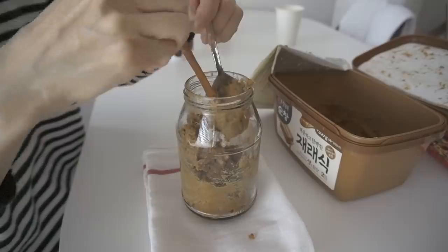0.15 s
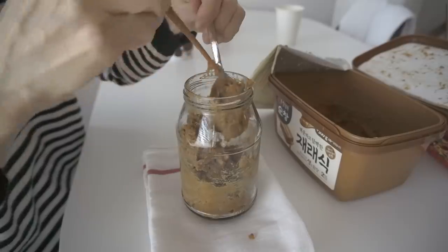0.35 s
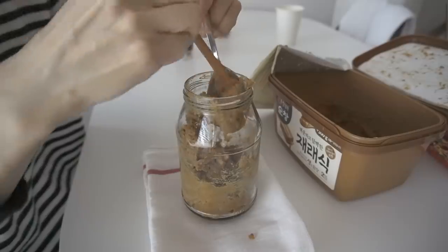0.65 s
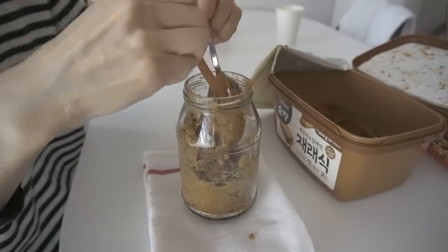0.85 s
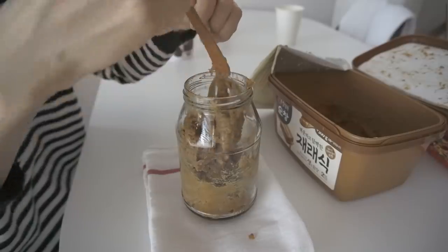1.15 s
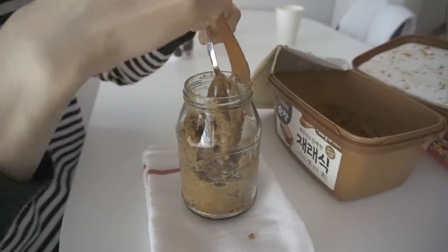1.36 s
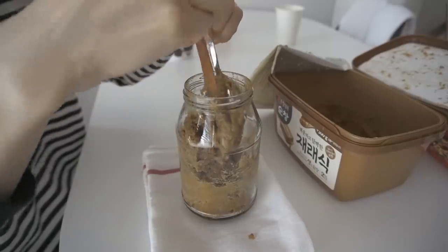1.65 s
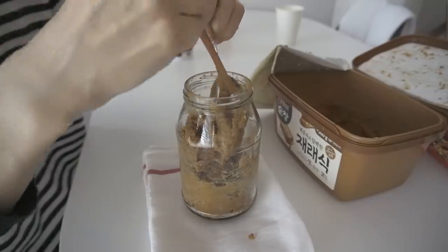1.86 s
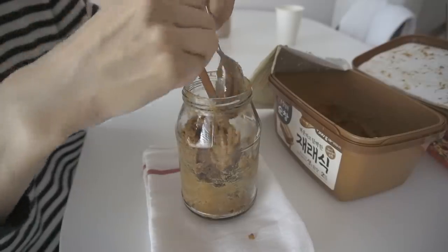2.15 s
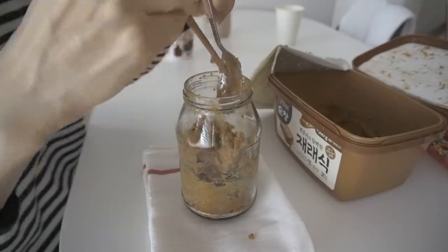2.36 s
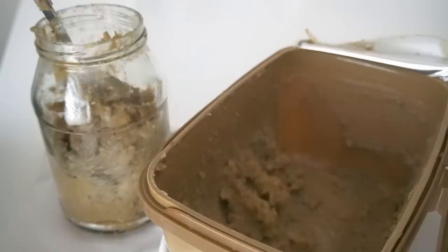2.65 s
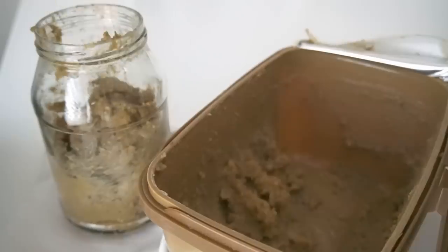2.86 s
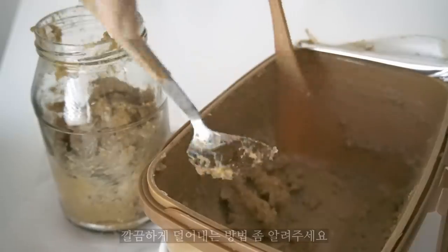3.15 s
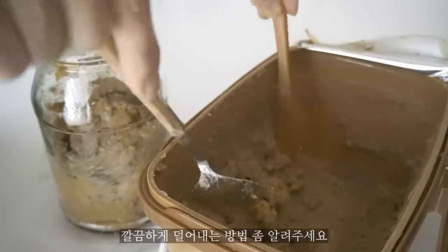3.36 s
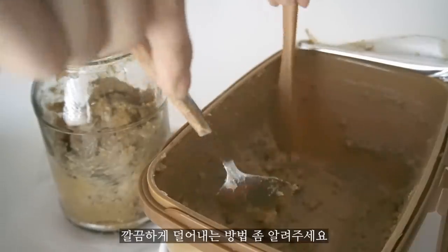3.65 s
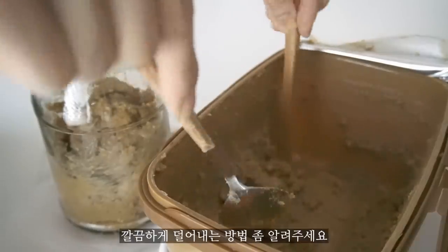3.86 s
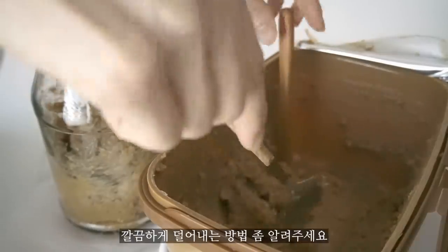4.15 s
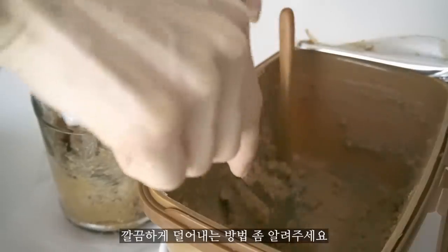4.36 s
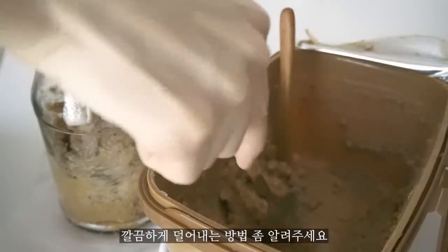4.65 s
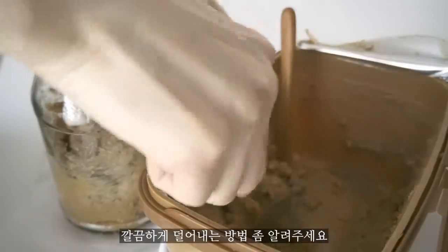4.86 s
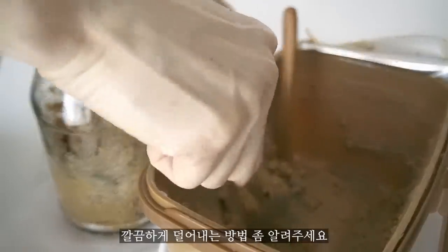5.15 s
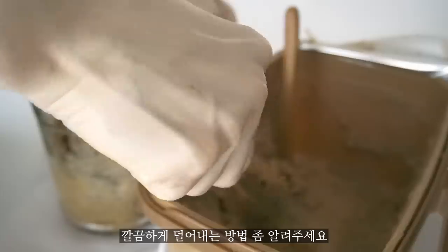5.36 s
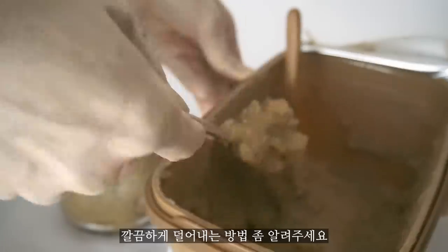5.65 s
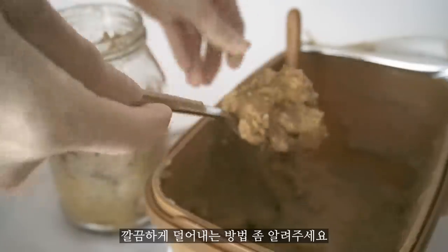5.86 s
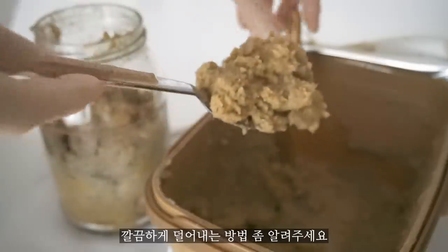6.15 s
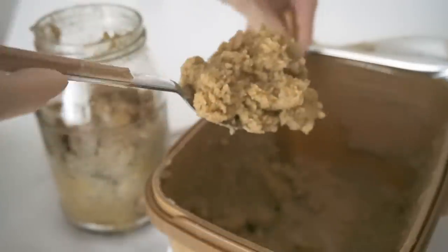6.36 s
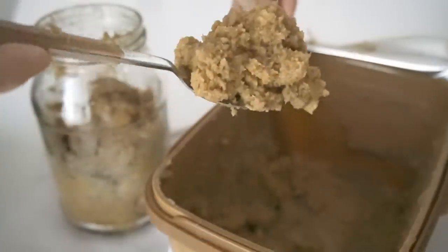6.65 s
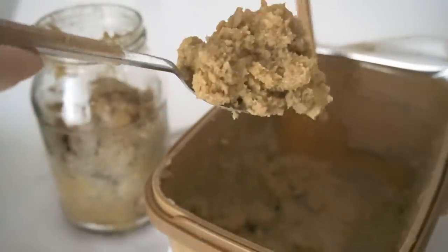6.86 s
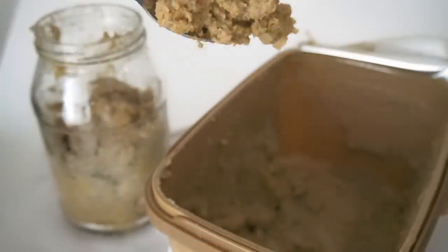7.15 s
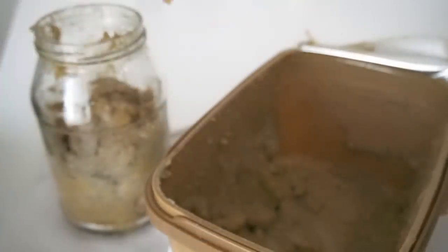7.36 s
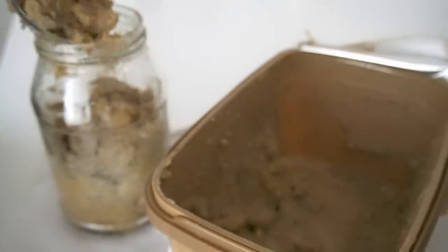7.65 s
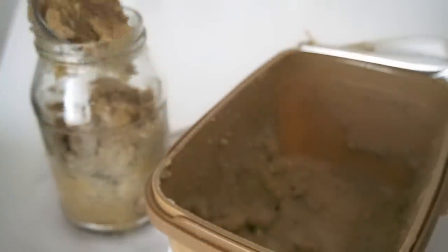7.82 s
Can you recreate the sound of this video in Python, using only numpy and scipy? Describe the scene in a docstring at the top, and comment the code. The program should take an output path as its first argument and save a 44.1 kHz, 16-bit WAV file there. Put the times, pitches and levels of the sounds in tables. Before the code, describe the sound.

Thick paste ticks and tears while a spoon taps glass, then plastic; a heavy overloaded bang on the table follows, with small wet pops after.

```python
"""At a kitchen table a spoon first clinks and grinds on a glass jar while thick bean paste crackles as it tears.
From about three seconds it knocks and drags in a plastic tub; near 5.5 s rumble and room noise jump up abruptly.
Past 6.7 s the tub drops back hard on the table and overloads the microphone; squelches, pops and jar follow.
Spoon, glass, plastic and table are noise cracks with decaying sines; the paste is ringing ticks and wet puffs.
Filtered noise makes the kitchen's reflections, rumble, room noise and hiss."""
import sys
import numpy as np
from scipy import signal
from scipy.fft import rfft, irfft, next_fast_len
from scipy.io import wavfile

SR = 44100
rng = np.random.default_rng(int(sys.argv[2]) if len(sys.argv) > 2 else 0)


def pcm_store(signal):
    """Save signal as 16-bit PCM."""
    levels = np.round(np.clip(np.atleast_2d(signal), -1, 1) * 32767)
    wavfile.write(sys.argv[1], SR, levels.astype(np.int16).T)


N = 352359

# Spoon taps on the jar. Each row: start in seconds, peak in dB, treble gain in dB,
# ring in dB (before the jar's overall ring gain).
JAR_TAPS = [(0.166, -54, 8.46, -18), (1.42, -30, -2, -19), (1.47, -36.5, -7, -8), (1.502, -34, -5, -9),
            (1.542, -36, 2, -13), (1.915, -30, -21, -4.5), (1.955, -42, -2, -11), (2.147, -27, -15, -20),
            (2.232, -43, 14, -11), (2.352, -22, -4, -6.5), (2.561, -29, -6, -9.5), (7.825, -26, -24, -21)]
# Spoon grinding along the glass. Each row: start in seconds, length in seconds, peak in dB,
# treble gain in dB, ring in dB (before the jar's overall ring gain).
JAR_SCRAPES = [(0.153, 0.041, -54, 13.5, 4), (1.501, 0.027, -43, -18, -10), (1.544, 0.031, -32, -10, -4.5),
               (2.152, .016, -28.5, 7, -25), (2.559, 0.069, -31, -3, -7.5), (2.627, 0.063, -37.5, -5, -7),
               (2.69, 0.109, -44.5, -2, -8), (2.791, .2, -49, -10, -16), (7.83, 0.048, -33.5, -4, -16),
               (7.895, 0.049, -29, 10, -4.5)]
# Modes of the glass jar, damped by paste. Each row: frequency in Hz, relative level in dB, t60 in seconds.
JAR_MODES = [(536, -4.5, 0.051), (1385, -5, 0.0093), (1880, 3, 0.0097), (2360, -14, 0.033),
             (2490, -21.5, 0.32), (2590, -11, 0.14), (2615, -14, 0.19), (2678, 7, 0.043), (2935, 0, 0.014),
             (3480, -12, 0.044), (4870, -18, 0.071), (5320, -10, 0.029), (5900, -22, 0.051),
             (7850, -27, .17)]
# Contact noise on the glass, spectrum shape. Each row: frequency in Hz, relative level in dB per Hz.
JAR_CRACK = [(200, -6), (500, 13), (2000, 9.5), (5000, 1.5), (10000, -6), (16000, -29)]
# Spoon knocks in the tub. Each row: start in seconds, peak in dB, treble gain in dB,
# ring in dB (before the tub's overall ring gain).
TUB_KNOCKS = [(3.186, -12, 0, 3.5), (3.199, -28, -7, -18), (3.209, -25, 3, -15), (3.222, -23.5, -1, -7),
              (3.44, -22, -11, 4.5), (3.481, -18, -8.5, 0.5), (3.493, -30, -11, -17),
              (4.558, -27.5, -12, -3), (4.565, -24.5, -6, -11), (4.758, -31, 0, -8), (4.997, -23.5, -2, 0),
              (5.749, -17.5, -18, -21), (5.821, -31, -13, -8)]
# Spoon dragging over the plastic. Each row: start in seconds, length in seconds, peak in dB,
# treble gain in dB, ring in dB (before the tub's overall ring gain).
TUB_SCRAPES = [(3.22, 0.017, -25, -6, -5.5), (4.766, 0.1, -38, -3, -11), (4.841, 0.054, -27, -11.5, -17),
               (4.924, 0.062, -36.5, 0, -19.5), (5.042, 0.017, -37, 12, -8), (5.743, 0.02, -22, 7, -19),
               (5.81, 0.021, -19.5, -9, -8.5)]
# Modes of the plastic tub. Each row: frequency in Hz, relative level in dB, t60 in seconds.
TUB_MODES = [(241, -8.5, 0.078), (380, -9.5, 0.048), (588, -22, 0.049), (677, -2, 0.031),
             (807, -3.5, 0.054), (930, 2, 0.016), (1163, 1.5, 0.037), (1790, -14, 0.053),
             (2043, -21.5, 0.07), (2440, -9, 0.017)]
# Contact noise on the plastic, spectrum shape. Each row: frequency in Hz, relative level in dB per Hz.
TUB_CRACK = [(120, -29), (600, 18.5), (1200, 0.5), (2000, 1.5), (4000, -7), (9000, -20.5), (16000, -41)]

# The spoon pulls through sticky paste. Each row: start in seconds, length in seconds,
# crackle level in dB (before the mix trim), treble gain in dB.
PULLS = [(0, 0.13, -51, 1), (0.157, 0.11, -60, 4), (.53, 0.14, -66.5, 11.5), (0.677, .25, -61, 8.5),
         (0.941, 0.15, -62.5, 9), (1.768, 0.21, -64.5, 0), (1.974, 0.24, -60.5, 4.5),
         (2.751, 0.032, -58.5, 12), (3.424, .12, -63.5, 6), (3.858, 0.28, -66, 5.5),
         (4.377, 0.059, -59.5, 4), (4.648, .38, -57.5, -17), (4.842, 0.039, -51.5, 1),
         (5.044, 0.21, -61, -2.5), (5.227, 0.084, -45, -6.5), (5.299, .19, -48.5, -2),
         (5.457, 0.35, -54.5, 4), (6.513, 0.14, -49.5, 3), (6.59, 0.13, -47.5, 3.5)]
PULL_ATTACK_S, PULL_RELEASE_S = 0.0082, 0.02  # the paste grips and lets go quickly
# Colour of the paste's crackle and snaps. Each row: frequency in Hz, relative level in dB.
CRACKLE_COLOUR = [(2000, -3), (2900, -4.5), (4500, 1), (6700, -8), (9000, 7), (12000, -1.5), (15500, -9)]
# Air pockets snapping in the paste. Each row: start in seconds, peak in dB, pitch in Hz.
SNAPS = [(0.0153, -23.5, 7940), (0.08, -29, 8650), (0.19, -34, 10100), (0.706, -35.5, 5300),
         (1.053, -31.5, 10200), (3.887, -37.5, 10000), (4.445, -30.5, 10600), (4.668, -29, 4050),
         (5.3497, -29, 2790), (5.3566, -26.5, 2900), (5.5016, -27, 5570), (5.5978, -24, 9200),
         (6.575, -27, 10670), (6.609, -32, 10100), (6.668, -18, 4250), (6.6751, -19.5, 4170)]
# Smaller snaps during a pull; their mean peak is given above the pull's crackle level
STRAY_SNAPS_PER_S, STRAY_SNAP_DB, STRAY_SNAP_HZ = 8.1, 18.5, (4000, 10900)
# Air squeezed through the paste in runs of wet blips. Each row: start in seconds, length in seconds,
# typical peak in dB, typical starting pitch in Hz, pitch sag in octaves per second.
SQUELCHES = [(6.625, .066, -32, 4380, .3), (7.016, .034, -26.5, 1860, 3.0), (7.066, .007, -27, 1460, 12),
             (7.091, .04, -27.5, 1230, 2.0), (7.245, .024, -26, 1216, 20)]
BLIP_GAP_S, BLIP_SLOWING_PER_S = 0.007, 8.0  # as the pressure drops, the blips come more slowly
# Single bubbles popping. Each row: start in seconds, peak in dB.
POPS = [(7.143, -33), (7.1923, -30), (7.274, -26.5), (7.441, -29.5), (7.468, -34), (7.498, -29.5),
        (7.524, -30), (7.669, -33.5), (7.791, -30.5)]
POP_HZ = 2980

# Blows reaching the microphone through the table top. Each row: start in seconds, peak in dB,
# contact cut-off in Hz.
THUDS = [(3.44, -24.5, 256), (3.482, -28.5, 260), (3.502, -27, 221), (4.9965, -38, 1300),
         (5.7495, -18.5, 915), (6.7219, 9, 5900), (6.748, -1.5, 347)]
# Modes of the table top. Each row: frequency in Hz, relative level in dB, t60 in seconds.
TABLE_MODES = [(72, -22, 0.36), (123.7, -30, 0.93), (147, -18, 0.25), (196, -9.5, 0.1), (264.2, -7, 0.159),
               (327, -10, 0.075), (363.6, -21, .25), (502.5, -4.5, 0.13), (652, 4, 0.044),
               (850, -18, 0.072), (1102, -13, 0.12), (1340, -12, .03), (1710, -16, 0.046)]
# Contact noise on the table, spectrum shape. Each row: frequency in Hz, relative level in dB per Hz.
TABLE_CRACK = [(80, 11.5), (500, 6.5), (1600, 6), (2600, -14), (4200, -20), (7000, -26), (16000, -27)]
# What the table sends into the room, spectrum shape. Each row: frequency in Hz, relative level in dB per Hz.
BOOM = [(70, 12), (200, -2), (520, -3.5), (900, -6.5), (1300, -12.5), (2000, -20.5), (2700, -35),
        (5000, -44), (12000, -56)]
# Decay of the kitchen's reflections. Each row: frequency in Hz, t60 in seconds.
ROOM_T60 = [(100, 0.47), (500, 0.71), (1500, 0.65), (4000, 0.38), (12000, 0.61)]

# Level of the low rumble over time. Each row: time in seconds, level in dB (before a fixed boost).
RUMBLE_LEVEL = [(0.0, -41.5), (0.11, -38), (0.15, -40.5), (1.8, -44), (2.98, -32), (3.38, -44.5),
                (5.41, -40.5), (5.52, -29.5), (6.65, -36.5), (6.83, -28), (7.01, -34), (7.68, -42.5),
                (7.79, -25), (7.99, -31)]
RUMBLE_BOOST_DB = 7.5
# Colour of the rumble, spectrum shape. Each row: frequency in Hz, relative level in dB per Hz.
RUMBLE = [(10, 20), (16, -11.5), (28, -5.5), (40, -3), (60, -10.5), (85, -30.5), (140, -44)]
# Level of the room noise, with an abrupt drop early and an abrupt jump up later.
# Each row: time in seconds, level in dB.
ROOM_LEVEL = [(.12, -45), (.15, -54.5), (1.8, -54.5), (5.46, -49.5), (5.5, -40), (7.99, -41)]
# Colour of the room noise, spectrum shape. Each row: frequency in Hz, relative level in dB per Hz.
ROOM_NOISE = [(60, -1), (80, 1), (130, -5), (231, -8), (364, -13), (524, -16), (905, -20), (1800, -26.5),
              (3000, -36.5)]
# Resonances in the room noise. Each row: frequency in Hz, level against the room noise in dB, t60 in seconds.
DRONE = [(255.5, -13.5, 0.21), (658, -13.5, 0.16), (1112, -35, 0.12)]
# Colour of the hiss, spectrum shape. Each row: frequency in Hz, relative level in dB per Hz.
HISS = [(2500, 5), (3500, -1.5), (5800, -5), (8500, -6.5), (12000, -9.5), (17000, -9.5)]
HISS_DB, HISS_FOLLOWS = -19.5, 0.88  # the hiss takes this share of the room noise's level in dB
CUTOFF_HZ = 16000  # top of the microphone channel
HIT = np.arange(int(0.8 * SR)) / SR  # time axis of one short sound, s


def spoon_on_jar():
    """Metal on glass: taps and grinding strokes set the paste-damped jar ringing."""
    return struck(JAR_TAPS, JAR_SCRAPES, JAR_MODES, JAR_CRACK, crack_t60=0.016, modes_db=5.0,
                  split_hz=1650, slips_per_s=1500, chatter_s=0.0054, chatter_db=-8.0)


def spoon_in_tub():
    """Spoon on plastic: knocks and drags set the tub ringing."""
    return struck(TUB_KNOCKS, TUB_SCRAPES, TUB_MODES, TUB_CRACK, crack_t60=0.035, modes_db=1.0,
                  split_hz=540, slips_per_s=1100, chatter_s=0.004, chatter_db=-8.0)


def struck(taps, scrapes, modes, crack, crack_t60, modes_db, split_hz, slips_per_s, chatter_s, chatter_db):
    """Taps, each with a brief chatter, and dragging strokes excite the same body."""
    out = np.zeros(N)
    for s, db, bright_db, ring_db in taps:
        body = harden(blow(modes, crack, crack_t60, modes_db + ring_db), bright_db, split_hz)
        force = amp(chatter_db) * slips(chatter_s, slips_per_s)
        force[0] = 1  # the tap itself
        add(out, s, signal.fftconvolve(body, force), db)
    for s, length, db, bright_db, ring_db in scrapes:
        body = harden(blow(modes, crack, crack_t60, modes_db + ring_db), bright_db, split_hz)
        add(out, s, signal.fftconvolve(body, slips(length, slips_per_s)), db)
    return out


def blow(modes, crack, crack_t60, ring_db):
    """One contact: a short crack, and the modes, each with a slightly different strength."""
    strengths = amp(0.5 * rng.standard_normal(len(modes)))
    tones = 0
    for k, (hz, db, t60) in enumerate(modes):
        sign = (-1) ** k  # neighbouring modes start in opposite directions
        tones = tones + sign * strengths[k] * amp(db) * np.sin(2 * np.pi * hz * HIT) * dying(t60)
    return amp(ring_db) * tones + noise(crack, len(HIT)) * dying(crack_t60)


def harden(x, bright_db, split_hz):
    """A harder contact has more treble."""
    low = cut(x, split_hz, "low", order=1)
    return low + amp(bright_db) * (x - low)


def slips(length, per_s):
    """Stick and slip: uneven tiny clicks over steady friction, swelling and fading; energy 1."""
    size = int(max(length, 0.004) * SR)
    grip = (rng.random(size) < per_s / SR) + 0.08  # 0.08 is the steady friction
    clicks = rng.standard_normal(size) * grip * signal.windows.tukey(size, 0.3)
    return clicks / np.linalg.norm(clicks)


def crackle(per_s, spread_db, cycles, split_hz):
    """Threads of paste break at random; each tick rings at its own choice of pitches, brighter in some pulls."""
    sizes = amp(spread_db * np.minimum(rng.exponential(1, N), 3))
    clicks = sizes * (rng.random(N) < per_s / SR)
    ticks = 0
    for hz in np.geomspace(2200, 15000, 22):
        woken = rng.random(N) < 0.3  # three ticks in ten wake this pitch
        strike = clicks * woken * rng.standard_normal(N)
        ticks = ticks + amp(at_hz(CRACKLE_COLOUR, hz)) * ring(strike, hz, cycles / hz)
    ticks = unit(ticks)
    gain, treble_gain = pulls()
    low = cut(ticks, split_hz, "low", order=3)
    high = cut(ticks, split_hz, "high", order=3)
    return gain * low + treble_gain * high


def pulls():
    """Each pull sets in, holds while the paste stretches and lets go; gives its gain and its treble's gain."""
    t, gain, treble_gain = np.arange(N) / SR, 0, 0
    for s, length, db, bright_db in PULLS:
        attack = np.clip((t - s) / PULL_ATTACK_S, 0, 1)
        release = np.clip((s + length - t) / PULL_RELEASE_S, 0, 1)
        pull = attack * release * amp(db)
        gain = gain + pull
        treble_gain = treble_gain + amp(bright_db) * pull
    return gain, treble_gain


def snaps(cycles, crack_t60, crack_db):
    """A pocket opens: a tick coloured by its cavity, which rings on briefly."""
    out = np.zeros(N)
    for s, db, hz in SNAPS + stray_snaps():
        colour = cut(noise(CRACKLE_COLOUR, len(HIT)), [hz / 2, hz * 2], "band", order=1)
        tick = unit(colour) * dying(crack_t60)
        cavity = np.sin(2 * np.pi * hz * HIT) * dying(cycles / hz)
        add(out, s, amp(crack_db) * tick + cavity, db)
    return out


def stray_snaps():
    """Small snaps fall at random within the pulls, stronger in a louder pull: rows (s, peak dB, pitch Hz)."""
    low, high = STRAY_SNAP_HZ
    rows = []
    for s, length, db, _ in PULLS:
        count = int(length * STRAY_SNAPS_PER_S)
        for when, size, pitch in rng.random((12, 3))[:count]:
            peak_db = db + STRAY_SNAP_DB + 8.0 * (size - 0.5)
            rows.append((s + when * length, peak_db, low * (high / low) ** pitch))
    return rows


def blips():
    """Trapped air escapes in squelching runs and in single pops, each pop with a tiny tick."""
    out = np.zeros(N)
    for row in SQUELCHES:
        for s, db, hz in squelch(*row):
            add(out, s, blip(hz, cycles=24.0, rise_s=0.00035, wet_db=-1.0), db)
    for s, db in POPS:
        tick = cut(rng.standard_normal(len(HIT)), [2200, 5500], "band") * dying(0.0059)
        add(out, s, blip(POP_HZ, cycles=39.0, rise_s=0.0002, wet_db=-4.0) + tick, db)
    return out


def squelch(s, length, db, hz, sag):
    """A run of uneven blips that slows and sinks in pitch: rows (s, peak dB, pitch Hz)."""
    rows, age = [], 0
    for gap, size, pitch in rng.standard_normal((16, 3)):
        if age < length:
            rows.append((s + age, db + 1.32 * size, hz * 2 ** (0.05 * pitch - sag * age)))
        age += BLIP_GAP_S * (1 + BLIP_SLOWING_PER_S * age) * np.exp(0.147 * gap)
    return rows


def blip(hz, cycles, rise_s, wet_db):
    """A puff of air swells in a small wet cavity and rings out."""
    splutter = unit(cut(rng.standard_normal(len(HIT)), [hz / 1.7, hz * 1.2], "band"))
    tone = np.sin(2 * np.pi * hz * HIT)
    swell = 1 - np.exp(-HIT / rise_s)
    puff = (tone + amp(wet_db) * splutter) * dying(cycles / hz) * swell
    return cut(puff, hz * 1.3, "low", order=4)


def thuds():
    """The table top rings, and fills the room with a broader boom; a soft contact wakes only the lows."""
    near, far = np.zeros(N), np.zeros(N)
    for s, db, soft_hz in THUDS:
        table_top = blow(TABLE_MODES, TABLE_CRACK, crack_t60=0.057, ring_db=4.0)
        boom = noise(BOOM, len(HIT)) * dying(0.025)
        add(near, s, cut(table_top, soft_hz, "low"), db)
        add(far, s, cut(boom, soft_hz, "low"), db)
    return near + amp(-6.5) * kitchen(far, build_s=0.0075, dull_hz=6800)


def kitchen(x, build_s, dull_hz):
    """Diffuse reflections build up, then die band by band."""
    edges = np.geomspace(70, 16000, 15)
    tail = 0
    for lo, hi in zip(edges, edges[1:]):
        band = cut(rng.standard_normal(len(HIT)), [lo, hi], "band")
        tail = tail + band * dying(at_hz(ROOM_T60, np.sqrt(lo * hi)))
    tail = tail * (1 - np.exp(-HIT / build_s))
    tail = cut(tail / np.linalg.norm(tail), dull_hz, "low", order=1)
    return signal.fftconvolve(x, tail)[:N]


def background():
    """Low rumble, room noise with a faint resonant drone, and hiss, all from filtered noise."""
    drone = sum(amp(db) * unit(ring(rng.standard_normal(N), hz, t60)) for hz, db, t60 in DRONE)
    room_db = curve(ROOM_LEVEL)
    air = amp(room_db) * (noise(ROOM_NOISE, N) + drone)
    hiss = amp(HISS_DB + HISS_FOLLOWS * room_db) * noise(HISS, N)
    rumble = amp(curve(RUMBLE_LEVEL) + RUMBLE_BOOST_DB) * noise(RUMBLE, N)
    return air + hiss + rumble


def noise(spectrum, size):
    """Coloured noise of rms 1, falling steeply past the ends of its spectrum."""
    fft_size = next_fast_len(size)
    hz = np.fft.rfftfreq(fft_size, 1 / SR) + 1e-3
    low_end = 1 / (1 + (spectrum[0][0] / hz) ** 6)
    high_end = 1 / (1 + (hz / spectrum[-1][0]) ** 12)
    white = rfft(rng.standard_normal(fft_size))
    coloured = white * amp(at_hz(spectrum, hz)) * low_end * high_end
    return unit(irfft(coloured, fft_size)[:size])


def ring(x, hz, t60):
    """Two-pole resonator: a unit click sets a decaying sine of height 1 ringing."""
    r, w = np.exp(-np.log(1000) / (t60 * SR)), 2 * np.pi * hz / SR
    return signal.lfilter([0, np.sin(w)], [1, -2 * r * np.cos(w), r * r], x + 1e-18)


def dying(t60):
    """Envelope that loses 60 dB in t60."""
    return np.exp(-np.minimum(np.log(1000) * HIT / t60, 60))


def cut(x, hz, kind, order=2):
    """Butterworth filter."""
    corner = np.clip(hz, 10, 0.45 * SR)
    return signal.sosfilt(signal.butter(order, corner, kind, fs=SR, output="sos"), x)


def amp(db):
    """Decibels to gain."""
    return 10 ** (np.asarray(db) / 20)


def unit(x):
    """Scale to rms 1."""
    return x / np.sqrt(np.mean(x ** 2) + 1e-20)


def curve(rows):
    """Points (s, value) joined by lines in time."""
    return np.interp(np.arange(N) / SR, *np.transpose(rows))


def at_hz(points, hz):
    """Read a table on a log-frequency axis."""
    points = np.array(points)
    return np.interp(np.log(hz), np.log(points[:, 0]), points[:, 1])


def add(out, s, sound, db):
    """Mix a sound in at a time and a peak level."""
    i = int(s * SR)
    scaled = amp(db) * sound / np.abs(sound).max()
    out[i:i + len(sound)] += scaled[:N - i]


def scene():
    """Jar, tub, paste and table, heard directly and by reflection in the kitchen, over the background."""
    jar = spoon_on_jar()
    tub = spoon_in_tub()
    paste = amp(-3.0) * crackle(per_s=800, spread_db=4.5, cycles=19.0, split_hz=4940)
    paste = paste + snaps(cycles=26.5, crack_t60=0.013, crack_db=-11.5) + blips()
    to_room = amp(-12.0) * jar + amp(-15.5) * tub + amp(-11.5) * paste
    echoes = kitchen(to_room, build_s=0.0034, dull_hz=5500)
    return (jar + tub + paste + thuds() + echoes + background())[None]


def record(dry):
    """The microphone input clips just under full scale; then a steep low-pass cuts the top."""
    clipped = np.clip(dry, -0.98, 0.98)
    return signal.sosfilt(signal.ellip(10, 0.1, 80, CUTOFF_HZ, fs=SR, output="sos"), clipped)


dry = scene()
out = record(dry)
pcm_store(out)
```